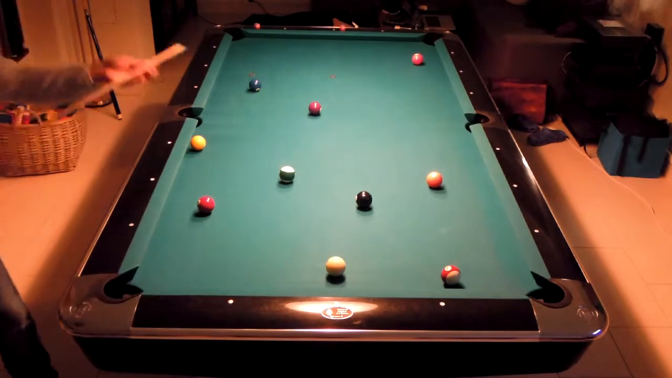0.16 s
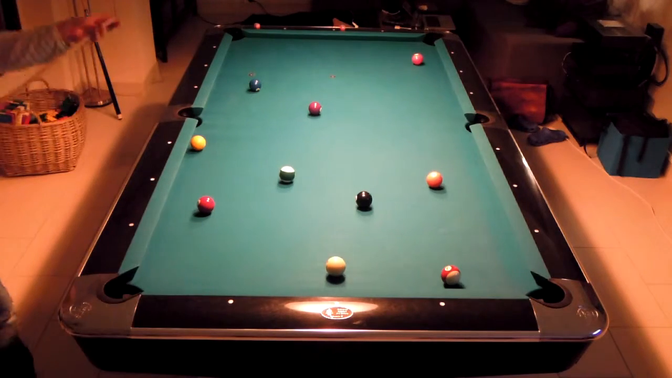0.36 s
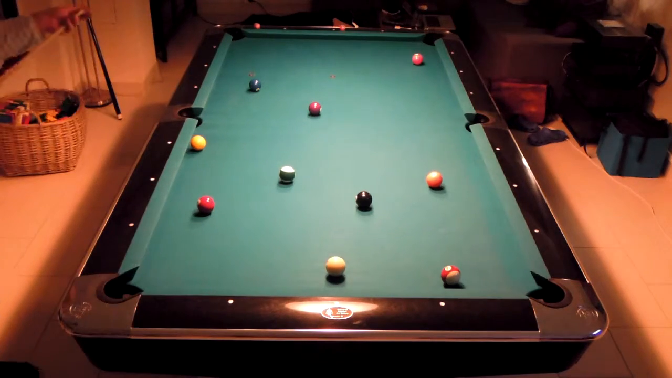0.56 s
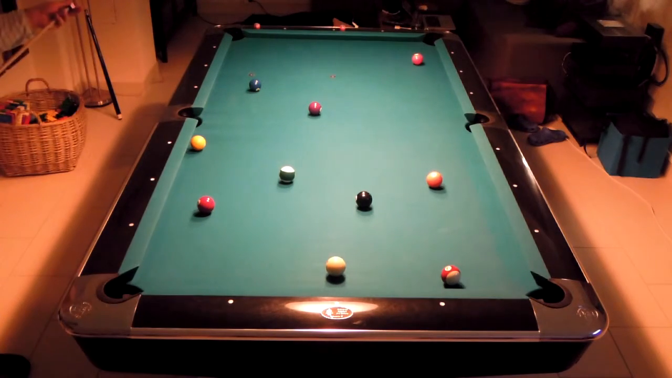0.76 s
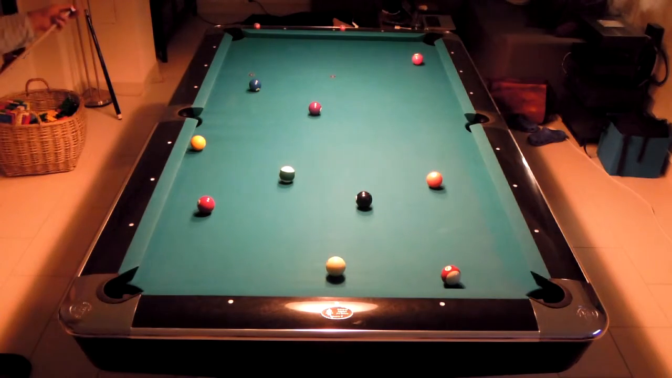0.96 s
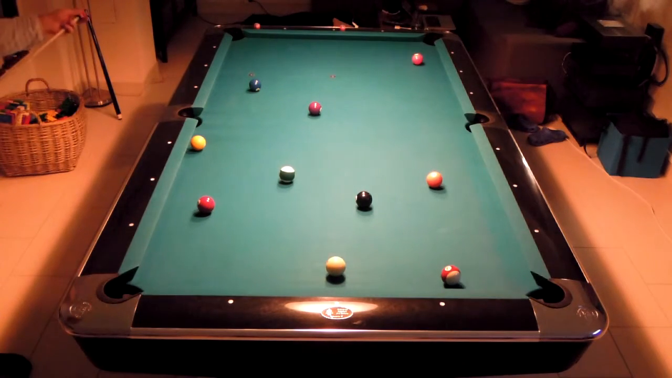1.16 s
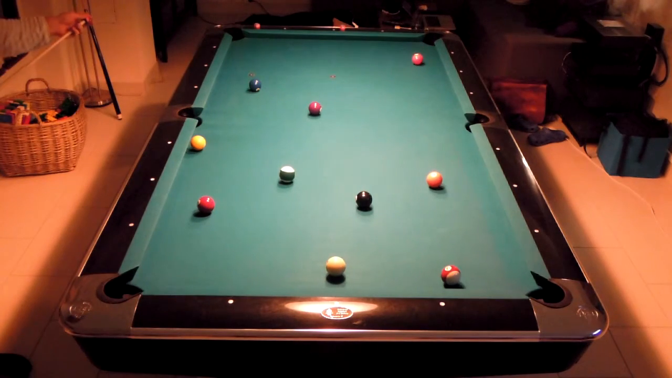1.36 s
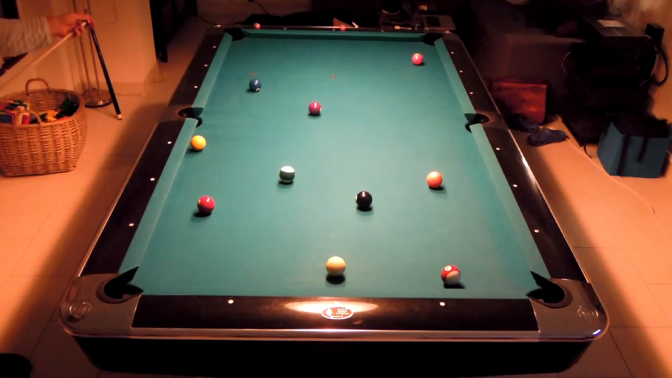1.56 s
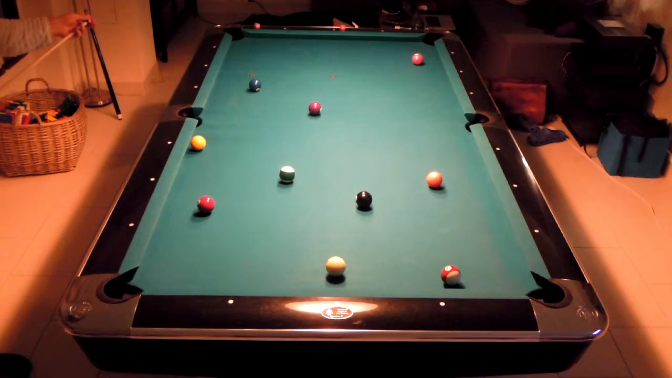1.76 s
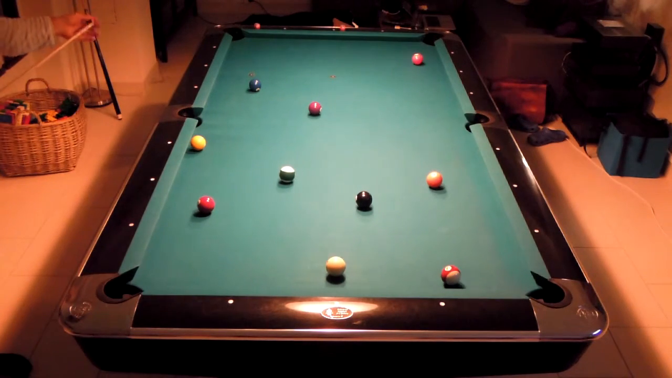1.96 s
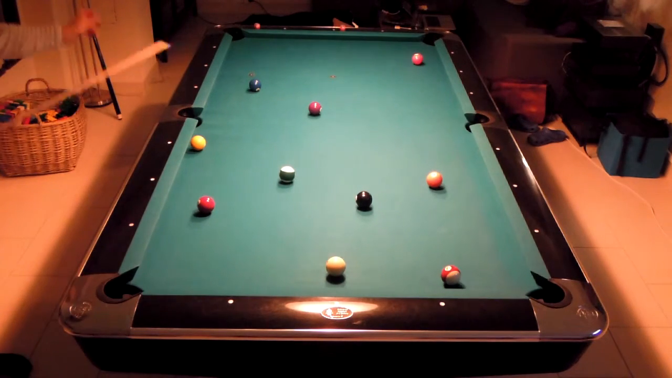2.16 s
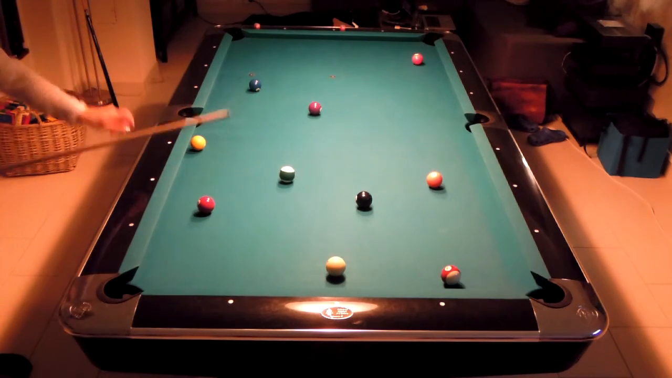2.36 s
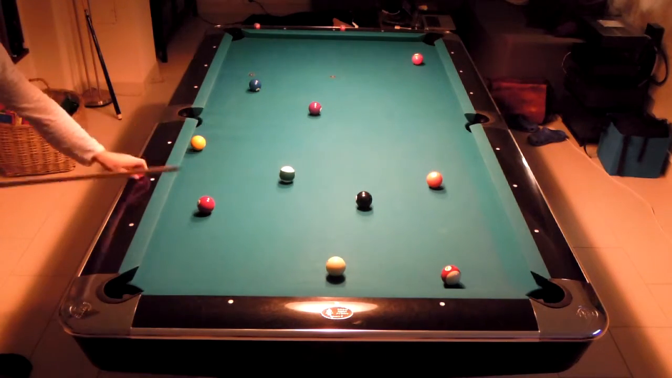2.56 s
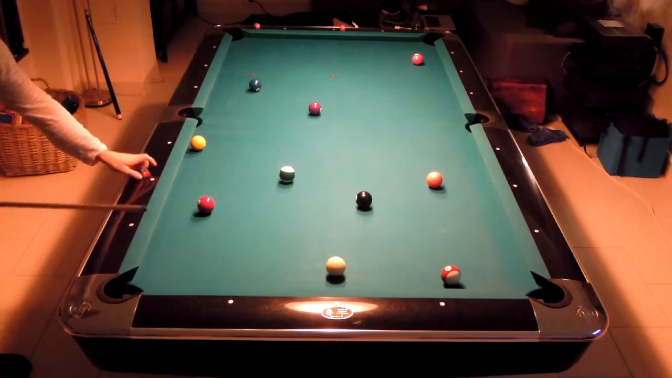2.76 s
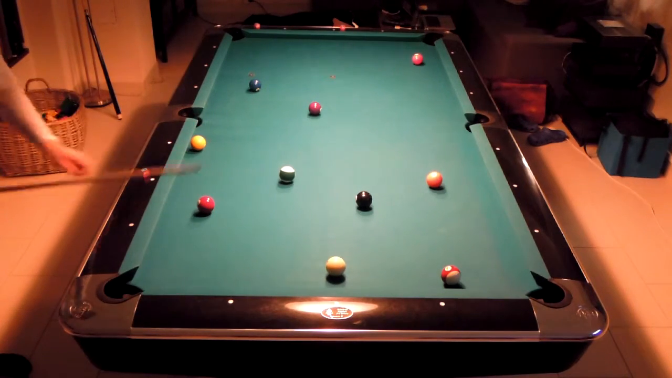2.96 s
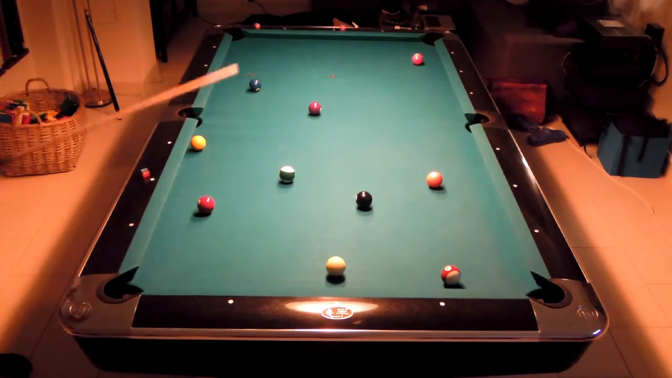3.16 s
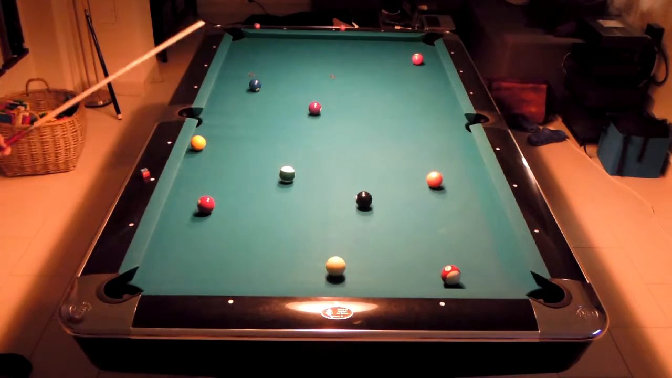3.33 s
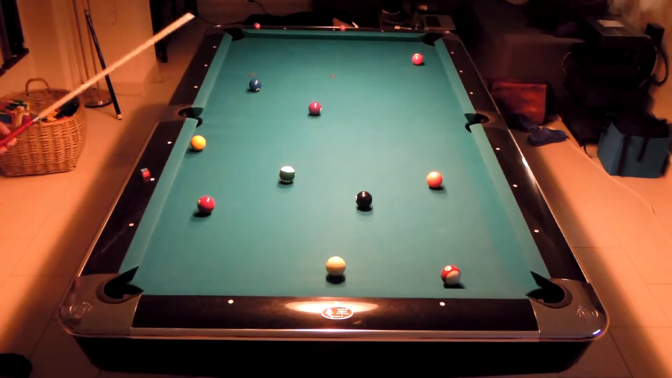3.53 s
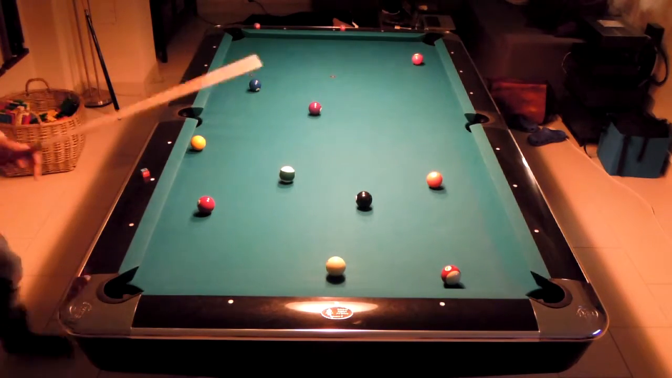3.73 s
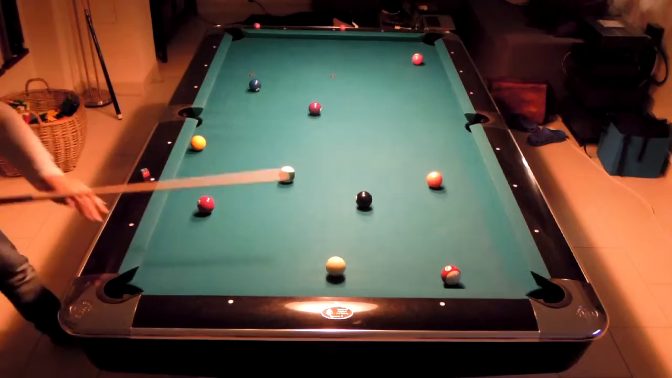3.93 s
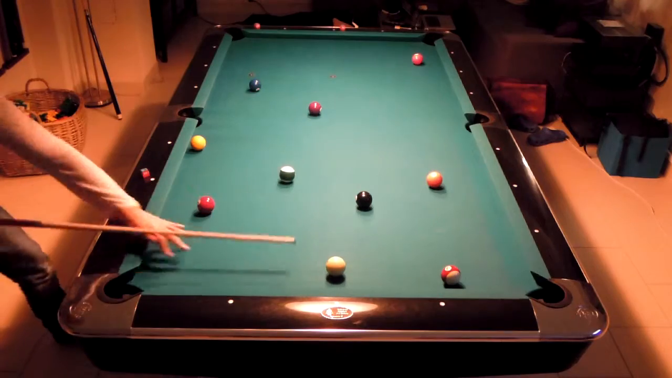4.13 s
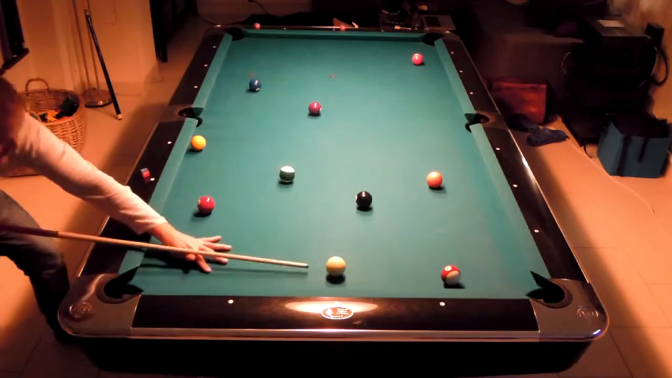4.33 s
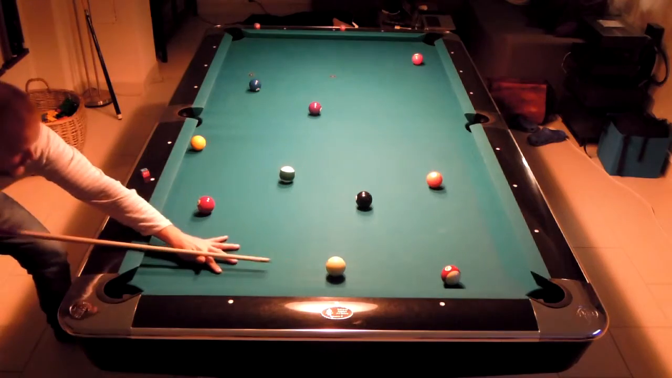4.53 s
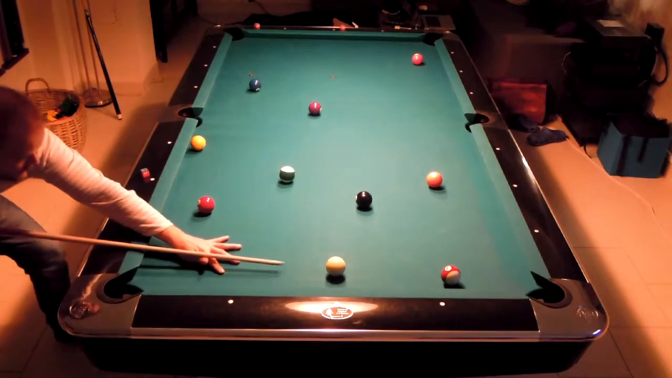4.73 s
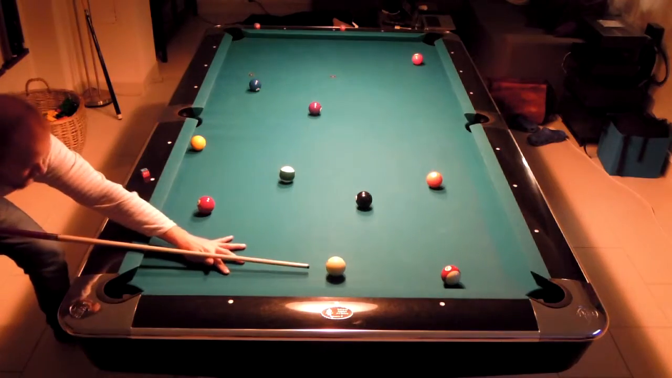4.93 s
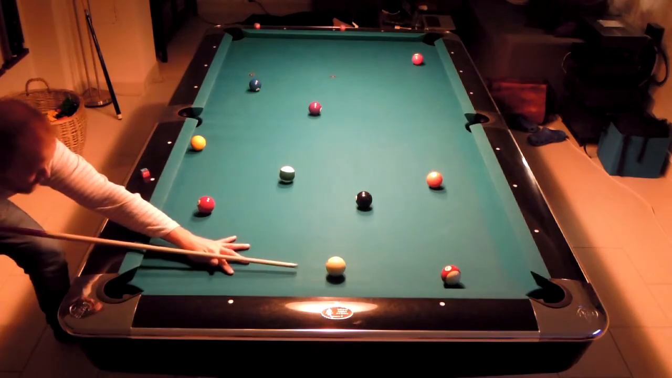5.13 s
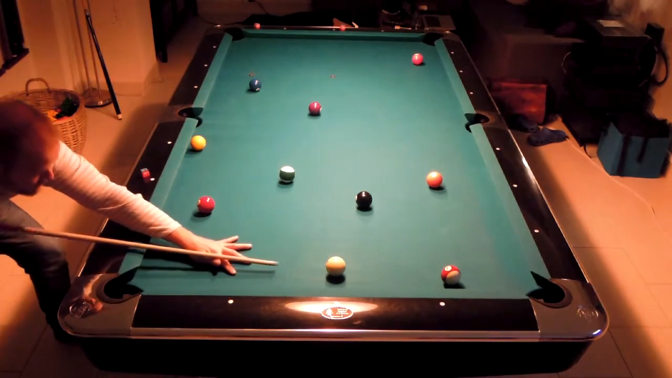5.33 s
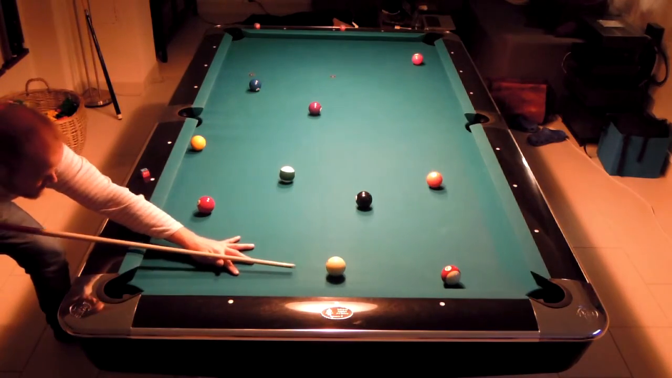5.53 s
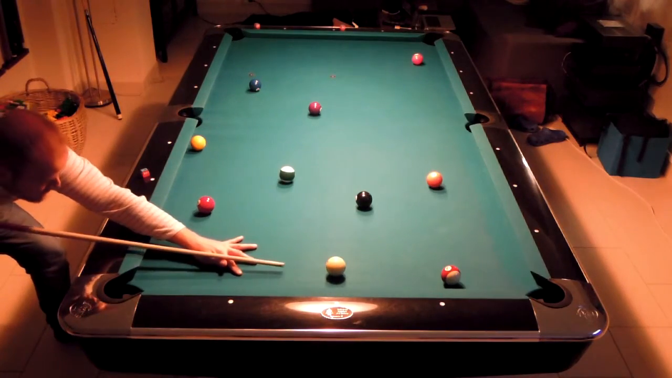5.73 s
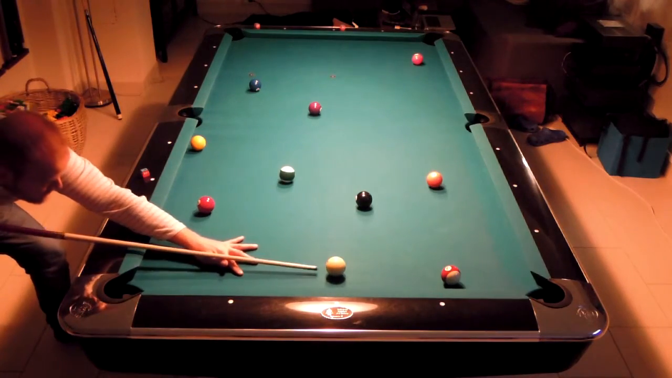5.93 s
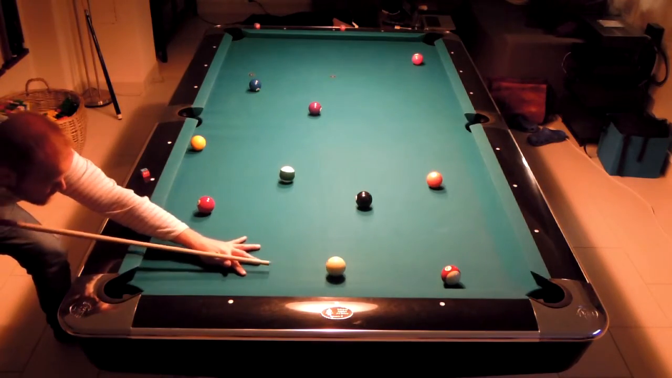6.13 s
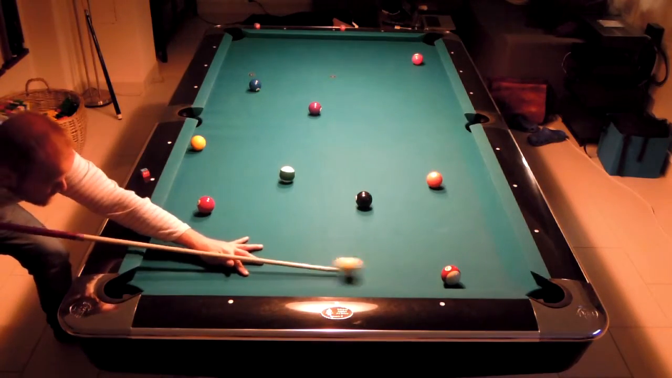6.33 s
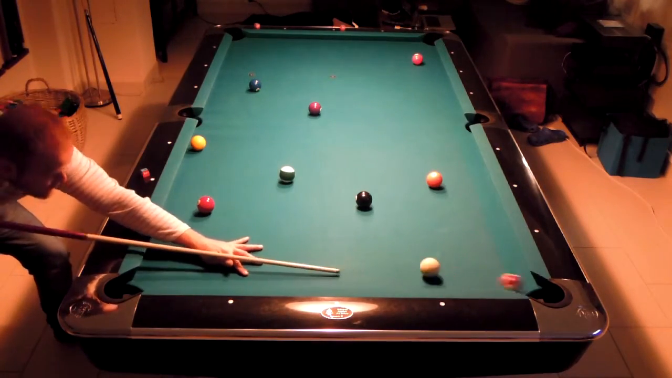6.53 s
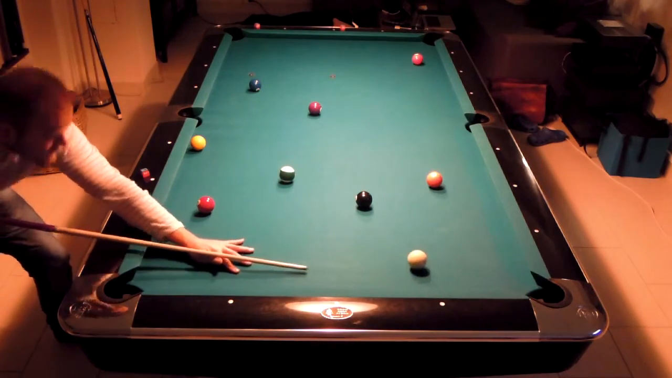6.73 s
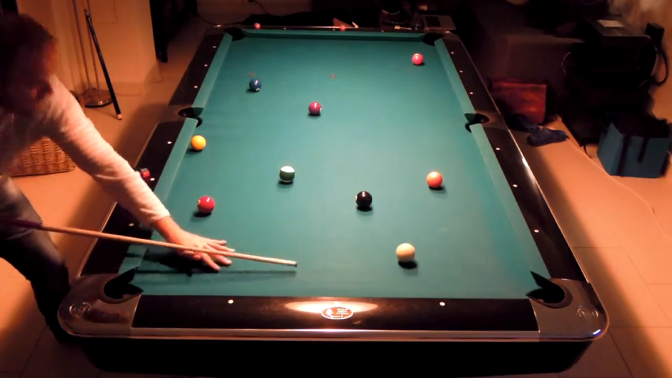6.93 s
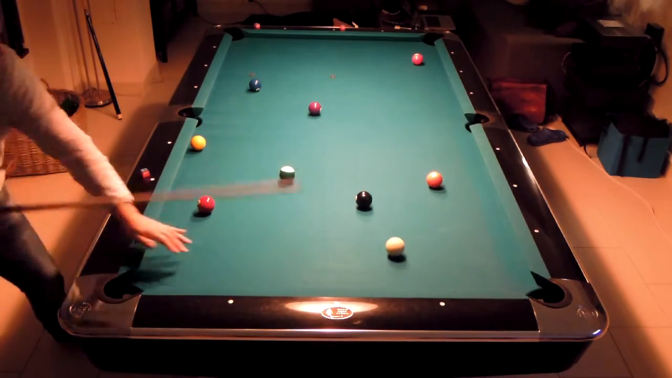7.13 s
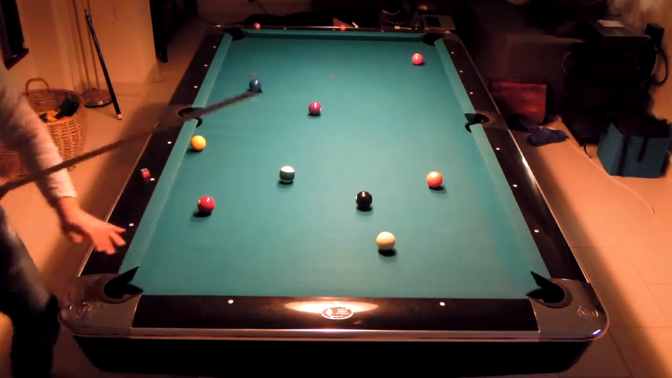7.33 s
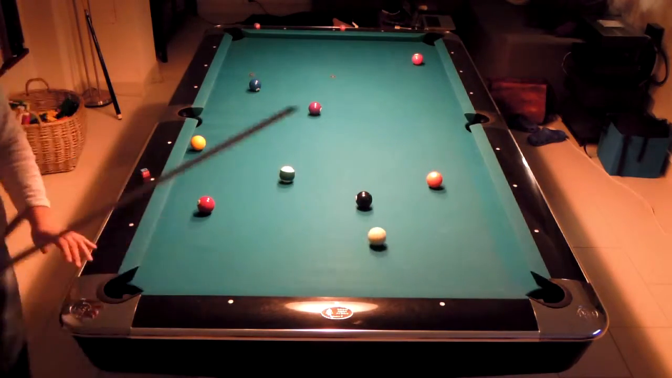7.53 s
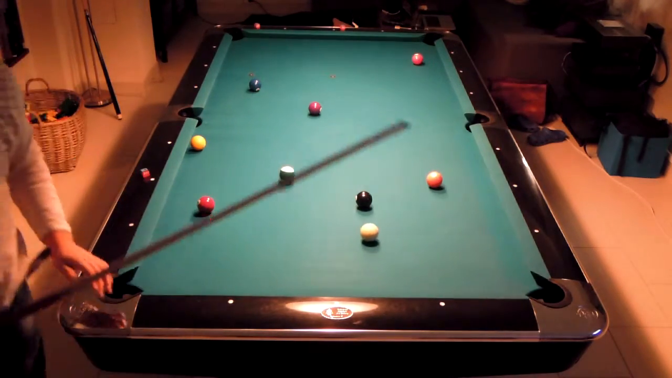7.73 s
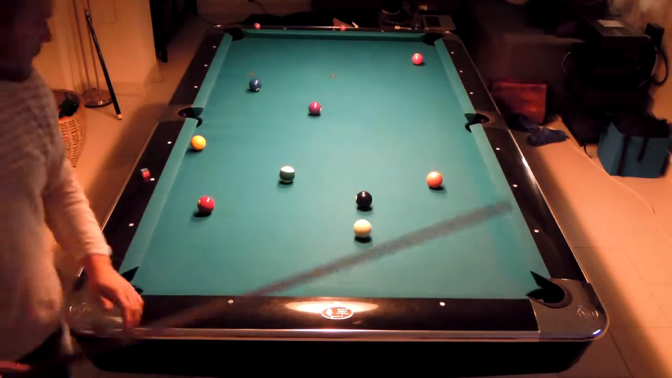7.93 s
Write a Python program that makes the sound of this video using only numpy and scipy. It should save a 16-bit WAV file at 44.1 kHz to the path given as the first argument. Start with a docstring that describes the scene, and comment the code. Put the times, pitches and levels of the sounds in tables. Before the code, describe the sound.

Quiet cue chalking and cloth rustle, then a cue knock, a loud ball clack, pocket thumps and a ball rattling down a wooden return.

```python
"""A cue ball clacks into a pool ball in a small, hard-walled games room: impacts as minimum-phase pulses.
The cue struck the white as tip scuff and ringing shaft; the struck ball thumps the pocket jaws, drops in and
rumbles down the return channel, exciting modes of channel and cabinet. Before that a hard object clinks, chalk
rasps and squeaks on the cue and is put on the rail, with dull bumps: noise under envelopes, and pulses.
Sleeves rustle over a faint room hiss, both shaped noise; the clack overloads the microphone."""
import sys
import numpy as np
from scipy import signal
from scipy.fft import rfft, irfft, next_fast_len
from scipy.io import wavfile

SR = 44100
rng = np.random.default_rng(int(sys.argv[2]) if len(sys.argv) > 2 else 0)


def wav_record(signal):
    """Record a signal, one row per channel, as 16-bit PCM in the file named by sys.argv[1]."""
    frames = np.transpose(np.atleast_2d(signal))
    bounded = np.clip(frames, -1, 1)
    # unit amplitude maps onto the largest positive 16-bit level
    quanta = np.round(bounded * 32767).astype(np.int16)
    wavfile.write(sys.argv[1], SR, quanta)


N = 356328  # samples

# modes of the wooden body of the table: f/Hz, relative level/dB, T60/s
CABINET = [(80.4, -13.5, 0.28), (133.5, -0.5, 0.116), (179.6, -1, 0.56), (198, -6, 0.1), (262, -6.5, 0.36),
           (290, -11.5, 0.38)]
# modes of the hollow return channel: f/Hz, relative level/dB, T60/s
CHANNEL = [(497.2, 1.5, 0.24), (510, -2.5, 0.14), (619, -7.5, 0.24), (718, -11, 0.3), (1120, -10, 0.067),
           (1300, -12, 0.052)]
# stereo spread of the room: f/Hz, side minus mid level/dB
ROOM_WIDTH = [(60, -14), (400, -24.5), (1300, -19.5), (2400, -15.5), (4400, -9), (8000, -3.5), (14000, 0.5)]


def clack():
    """Impact and early reflection: two resin balls touch briefly; rails and low ceiling throw the click back."""
    # ball on ball: t/s, energy level/dB, room level/dB
    clacks = [(6.6442, 13, 10)]
    # spectrum of the resin contact: f/Hz, relative level/dB
    resin = [(30, -53), (85, -7.5), (280, -8), (480, -8), (900, -0.5), (1400, 6.5), (2000, 10.5),
             (2600, 12), (3100, 6), (3800, -1), (4800, -20.5), (8000, -20.5), (14000, -19)]
    slaps = [(.0011, -6), (.0019, -9.5), (.0068, 0), (.0079, 6.5), (.0087, -23)]  # delay/s, level/dB
    return knocks(clacks, resin, slaps)


def cue():
    """Friction, then modal excitation: the chalked tip scuffs the white as it bites; the blow rings the shaft."""
    # cue on the white: t/s, knock level/dB, tip scuff level/dB, shaft ring level/dB
    strokes = [(6.5199, 4.5, 8.5, -1)]
    # spectrum of the tip's knock: f/Hz, relative level/dB
    tip = [(30, -40), (130, -6), (290, 3.5), (360, -2.5), (620, 7), (800, 8.5), (1050, 6.5), (1600, 2),
           (2200, 9.5), (2700, -6.5), (4000, -3), (6000, -26), (14000, -32)]
    # spectrum of the tip's scuff: f/Hz, relative level/dB
    scuff = [(60, -27), (800, -5), (3000, -5.5), (5000, -1), (6500, -6.5), (8200, -0.5), (10200, -3),
             (12500, -0.5), (14500, -18)]
    # modes of the shaft: f/Hz, relative level/dB, T60/s
    shaft = [(533, -12, .1), (1028, -7, .08), (1346, 1, .085), (1895, 1, .025), (2140, -3, .02),
             (2330, -5, .035), (3068, -9, .02), (3763, -12, .02), (5400, -10, .015)]
    scuff_lead_s = .0022
    out = 0
    for s, db, scuff_db, shaft_db in strokes:
        bite = amp(scuff_db) * burst(scuff, life=0.0014)
        blow = amp(db) * pulse(tip) + amp(shaft_db) * ring(shaft)
        out += placed(s - scuff_lead_s, room(bite, wet_db=0.0))
        out += placed(s, room(blow, wet_db=10.5, slaps=[(.0065, 0.0031)]))
    return out


def pocket():
    """Impact excitation of modes: jaws and drop knock the ball; each blow rings channel and cabinet."""
    # ball on the rubber jaws: t/s, thud level/dB, cabinet level/dB
    jaws = [(6.849, 1.5, 3.5), (6.866, -2.5, 8), (6.909, -2.5, 6.5)]
    # spectrum of the rubber thud: f/Hz, relative level/dB
    rubber = [(30, -38), (90, -19), (150, 9), (260, -3), (360, -5.5), (620, 3), (800, -10), (1300, -6),
              (2600, -26), (4000, -22), (8000, -32), (14000, -39)]
    # ball dropping through the pocket and along the return: t/s, knock level/dB, cabinet level/dB
    drops = [(6.9397, 7, 0), (6.9552, 0.5, -10), (7.199, 1.6, -12), (7.3192, -8, -11), (7.352, -7.5, -14),
             (7.467, -5, -5), (7.5219, -10, -11), (7.535, -10.5, 1), (7.622, -15.5, -7.5)]
    # spectrum of a knock before its tilt: f/Hz, relative level/dB
    knock_colour = [(30, -41), (100, -34), (350, -2), (520, 6.5), (850, -3), (1080, 11), (1500, -0.5),
                    (2300, 5), (3000, 2), (3600, -13), (4500, -23.5), (8000, -29), (14000, -31.5)]
    return_s = 7.2  # the ball leaves the open pocket for the closed channel
    room_db, room_db_per_s = 6.0, 16.5  # the deeper the ball, the less is heard directly
    bright_db, muffle_db_per_s = 1.86, 17  # and the duller it knocks: brightness in dB per octave
    cup = [(.0012, -3.5), (.0019, -2)]  # echoes focused by the cup of the pocket: delay/s, level/dB
    out = 0
    for s, db, body_db in jaws:
        thud = amp(db) * burst(rubber, life=0.0028)
        wood = amp(body_db) * ring(CABINET) + amp(db + 2) * ring(CHANNEL)
        out += placed(s, room(thud, wet_db=3.5) + room(wood, wet_db=-13.0))
    for s, db, body_db in drops:
        inside_s = max(s - return_s, 0)
        wet_db = room_db + room_db_per_s * inside_s
        tilt_db = bright_db - muffle_db_per_s * inside_s
        knock = amp(db) * pulse(knock_colour, tilt_db)
        wood = amp(body_db) * ring(CABINET) + amp(db - 0.5) * ring(CHANNEL)
        out += placed(s, room(knock, wet_db, cup) + room(wood, wet_db=-5.0))
    return out


def rolling():
    """Roughness excitation: balls rumble over slate; in the return channel tiny bumps rattle and drive the wood."""
    # the white before and after the clack and the struck ball between: start t/s, end t/s, level/dB
    rolls = [(6.533, 6.602, -35), (6.656, 6.851, -32), (6.68, 8.07, -48.5)]
    # the pocketed ball on the legs of the return: start t/s, end t/s, rumble level/dB, rattle level/dB
    runs = [(6.95, 7.16, -35, -33), (7.252, 7.407, -38.5, -33.5), (7.47, 7.676, -39, -29.5)]
    # spectrum of the rumble: f/Hz, relative level/dB
    slate = [(25, -35.5), (55, -19), (84, 5.5), (108, -21), (170, -2), (240, 2.5), (330, -2.5), (430, -12),
             (800, -27), (2000, -37), (6000, -60)]
    # spectrum of the rattle: f/Hz, relative level/dB
    rattle_colour = [(100, -16), (380, -24), (520, -5), (720, 5.5), (840, 4.5), (1050, -2), (1400, -6),
                     (1800, 5), (2700, -37), (3500, -10), (5000, -22), (14000, -29.5)]
    attack_s, slowing_db_per_s, release_db_per_s = 0.01, 13, 133
    settle_db_per_s = 92  # the rattle dies as the ball settles into each run
    cabinet_db, channel_db = 2.0, -5.5  # cabinet over rumble, channel over bumps
    bump_rate = 250  # mean bumps per second

    def roll(start, end, fade_db_per_s):
        """Envelope of one passage: friction makes it fade."""
        return spell(start, end, attack_s, fade_db_per_s, release_db_per_s)

    def driven(modes):
        """Forced vibration: dense contacts convolved with a modal ring."""
        return unit(signal.fftconvolve(grains(spread_db=5.5), ring(modes))[:N])

    on_slate = sum(amp(db) * roll(start, end, slowing_db_per_s) for start, end, db in rolls)
    inside = sum(amp(db) * roll(start, end, slowing_db_per_s) for start, end, db, _ in runs)
    rattle = sum(amp(db) * roll(start, end, settle_db_per_s) for start, end, _, db in runs)
    rumble = (on_slate + inside) * coloured(grains(spread_db=3), slate)
    body = amp(cabinet_db) * inside * driven(CABINET)
    bumpy = (rng.random(N) < bump_rate / SR) * rng.standard_normal(N)
    clatter = rattle * (coloured(bumpy, rattle_colour) + amp(channel_db) * driven(CHANNEL))
    return room(rumble + body, wet_db=-10.5) + room(clatter, wet_db=1.0)


def boom():
    """Resonance build-up: the lowest table mode grows while the ball runs inside, then rings out."""
    boom_hz, boom_db = 44.3, -37.5
    start_s, end_s, attack_s, release_db_per_s = 6.95, 7.48, .18, 32
    phase_drift = .5 * unit(filtered(rng.standard_normal(N), lambda hz: hz < 3))
    level = amp(boom_db) * spell(start_s, end_s, attack_s, 0, release_db_per_s)
    return level * np.sin(2 * np.pi * boom_hz * np.arange(N) / SR + phase_drift)


def chalking():
    """Dry friction: loose grit rasps in clumps and rings the cube; the leather squeaks where it catches."""
    # back-and-forth strokes of the chalk over the tip: t/s, level/dB, half length/s
    chalk_strokes = [(0.983, -57, 0.0037), (1.013, -42.5, .01), (1.057, -50, .029), (1.165, -49, .026),
                     (1.224, -41, 0.018), (1.311, -38, 0.016), (1.406, -45.5, 0.019), (1.479, -44, 0.017),
                     (1.543, -46, 0.018), (1.618, -49.5, 0.01), (1.685, -48, 0.017), (1.817, -50, .015),
                     (1.894, -44.5, 0.02), (1.969, -52, .008), (2.046, -48, 0.027), (2.125, -39.5, 0.0045)]
    # spectrum of the scraping: f/Hz, relative level/dB
    chalk = [(530, -30), (900, -11.5), (1190, -13.5), (1490, -10), (1800, -10.5), (2790, -4.5),
             (6350, -5.5), (13500, -10.5), (14500, -36), (15000, -62)]
    # spectrum of the squeak: f/Hz, relative level/dB
    squeak_colour = [(800, -37), (2000, -15), (3200, -8), (4000, 3.5), (5500, 1), (7500, 3.5), (9000, -7),
                     (14000, -45)]
    # resonances of the chalk cube and ferrule: f/Hz, width/Hz, relative level/dB
    cube = [(1485, 73, -4), (3100, 86, -1), (5110, 150, -1.5), (6330, 120, -1), (6760, 43, -4),
            (7200, 37, -7), (7900, 42, -3)]
    cube_db = -10.5  # resonances over scraping
    # before the room, a stroke of this half length squeaks as loudly as it rasps; quicker ones squeak more
    even_s, squeak_db_per_halving = 0.018, 5
    clump_hz = 180  # upper limit of the clumping
    clumps = np.tanh(unit(filtered(rng.standard_normal(N), lambda hz: hz < clump_hz)))
    scraping = amp(5.0 * clumps) * coloured(grains(spread_db=2.5), chalk)
    cube_ring = amp(cube_db) * resonant(grains(spread_db=21), cube)
    rasp = unit(unit(scraping) + cube_ring)
    grit = swells(chalk_strokes) * rasp
    catches = [(s, db + squeak_db_per_halving * np.log2(even_s / half), half)
               for s, db, half in chalk_strokes]
    squeak = swells(catches) * coloured(grains(spread_db=11.5), squeak_colour)
    slightly_left = amp([[.6], [-.6]])
    return slightly_left * (room(grit, wet_db=4.0) + room(squeak, wet_db=-5.5))


def taps():
    """Impact: the chalk is put on the rail in short contacts."""
    # chalk on the rail: t/s, energy level/dB, room level/dB
    contacts = [(2.7556, -17, 16.5), (2.7595, -8, 5), (2.793, -20, 11)]
    # spectrum of the contact: f/Hz, relative level/dB
    rail = [(40, -19), (170, -6), (290, 7), (410, 2.5), (530, 4.5), (780, 0), (1000, 3), (1450, -2.5),
            (2350, 3.5), (3200, -3.5), (4100, -12.5), (5500, -26), (14000, -35)]
    return knocks(contacts, rail)


def clink():
    """Impact with modal decay: a small hard object knocks and rings briefly, away from the table."""
    # small hard object set down: t/s, knock level/dB, ring level/dB
    clinks = [(.3262, -5.5, -6.5)]
    # spectrum of its knock: f/Hz, relative level/dB
    clink_colour = [(100, -37), (370, -24), (500, -12), (700, -19.5), (950, -3.5), (1150, -13),
                    (2000, -1.5), (3100, 1.5), (3900, -18), (5000, -10), (6600, -12.5), (8200, -24),
                    (14000, -26.5)]
    # modes of the object: f/Hz, relative level/dB, T60/s
    clink_modes = [(980, -17, .04), (1320, -13, .05), (1873, -10, .05), (2509, -3, .045), (2760, -1, .06),
                   (2905, 0, .06), (3110, 0, .04), (5010, -16, .03), (5900, -17, .03)]
    slaps = [(.006, 1.9), (.013, 0.58)]  # delay/s, level/dB
    out = 0
    for s, db, ring_db in clinks:
        blow = amp(db) * pulse(clink_colour) + amp(ring_db) * ring(clink_modes)
        out += placed(s, room(blow, wet_db=14.5, slaps=slaps))
    return out


def bumps():
    """Soft impact: dull, mostly low-frequency contacts as the player moves about."""
    # bumps: t/s, energy level/dB, room level/dB
    contacts = [(2.2262, -13, 6), (2.236, -18, 11), (2.30, -27, 9), (3.09, -31.5, 10), (3.33, -32, 13),
                (3.575, -26.5, -1)]
    # spectrum of a bump: f/Hz, relative level/dB
    bump_colour = [(30, -28), (85, 1.5), (120, -14), (175, 3.5), (280, -5.5), (400, -9), (500, 3), (650, 0),
                   (760, -20), (1100, -8), (2500, -14.5), (3300, -20.5), (6000, -42), (14000, -57)]
    return knocks(contacts, bump_colour)


def sleeves():
    """Friction noise: cloth brushes softly as the player moves; the shaft slides through the hand, brighter."""
    # sleeves rustling as the player moves: t/s, level/dB, half length/s
    rustles = [(.1, -47.5, 0.046), (.51, -40.5, 0.048), (.71, -41.5, .15), (3.23, -49, 0.047),
               (3.827, -47, 0.026), (4.151, -43, 0.074), (4.437, -43, 0.068), (7.484, -34.5, .017),
               (7.8, -45.5, .25)]
    # shaft in the hand, as the cue is lowered, aimed and lifted: t/s, level/dB, half length/s
    slides = [(3.513, -48, 0.029), (3.624, -41.5, 0.055), (4.7, -49.5, 0.22), (4.983, -50.5, 0.035),
              (5.54, -49.5, .31), (6.336, -51, 0.082), (6.49, -46, 0.032), (7.598, -49.5, 0.05)]
    # spectrum of the friction before it is split: f/Hz, relative level/dB
    cloth_colour = [(300, -22.5), (1000, 3), (2500, 4.5), (5000, 4), (10000, 5.5), (14500, 0.5)]
    rustle_treble_db, slide_bass_db = -9, -12  # sleeves are dull, the shaft hisses
    split_hz = 4000
    pair = np.array([coloured(grains(spread_db=4.5), cloth_colour) for _ in range(2)])
    rustle = stereo(pair, ROOM_WIDTH)
    dull = filtered(rustle, lambda hz: 1 / (1 + (hz / split_hz) ** 2))
    cloth, shaft = swells(rustles), swells(slides)
    low = cloth + amp(slide_bass_db) * shaft
    high = shaft + amp(rustle_treble_db) * cloth
    return amp([[-1], [-2.5]]) * (low * dull + high * (rustle - dull))  # the player stands on the left


def air():
    """Stationary noise: the steady hiss and rumble of the room."""
    # spectrum of the room noise: f/Hz, relative level/dB
    air_colour = [(12, -32), (20, 6.5), (54, -3.5), (84, 1), (143, -7), (183, -5), (497, -8.5),
                  (796, -10.5), (1170, -7.5), (1930, -16), (2340, -13), (3180, -17), (10500, -21.5),
                  (13800, -20.5), (15000, -65)]
    # its stereo spread: f/Hz, side minus mid level/dB
    air_width = [(60, -10.5), (110, -3.5), (200, -4), (380, -2.5), (700, -3), (1290, -5), (2370, -1.5),
                 (4380, -1), (8090, -1), (14900, -0.5)]
    return amp(-51.5) * stereo(coloured(rng.standard_normal((2, N)), air_colour), air_width)


def knocks(rows, spectrum, slaps=()):
    """Impulse response: short contacts (t/s, level/dB, room level/dB) that ring only in the room."""
    return sum(placed(s, room(amp(db) * pulse(spectrum), wet_db, slaps)) for s, db, wet_db in rows)


def room(x, wet_db, slaps=(), early_db=3.5, early_s=0.048):
    """Reverberation: direct sound, slaps (delay/s, level/dB) and a diffuse tail with a stronger early part."""
    # decay time of the diffuse field: f/Hz, T60/s
    room_t60 = [(100, 0.67), (400, 0.62), (1000, 0.59), (2700, 0.58), (7000, 0.44), (14000, 0.28)]
    hz, t, z = signal.stft(rng.standard_normal((2, SR)), SR, nperseg=256)
    decay = np.exp(-np.log(1000) * t / along(room_t60, hz)[:, None])
    tail = signal.istft(z * decay, SR, nperseg=256)[1][:, :SR]
    t = np.arange(SR) / SR
    onset = 1 - np.exp(-(t / 0.00084) ** 2)
    tail *= onset * amp(early_db * np.exp(-t / early_s))
    answer = amp(wet_db) * stereo(tail / np.linalg.norm(tail[0]), ROOM_WIDTH)
    answer[:, 0] += 1  # direct sound
    for delay, db in slaps:
        answer[:, round(delay * SR)] += amp(db)
    return signal.fftconvolve(x[None], answer, axes=1)[:, :N]


def pulse(spectrum, tilt_db=0):
    """Minimum phase: a causal contact pulse of energy 1, half a second long, from a folded cepstrum."""
    hz = np.fft.rfftfreq(SR, 1 / SR)
    tilt = tilt_db * np.log2(np.maximum(hz, 500) / 1000)  # dB, level below 500 Hz
    cepstrum = irfft(np.log(amp(along(spectrum, hz) + tilt)))
    cepstrum[1:SR // 2] *= 2
    cepstrum[SR // 2 + 1:] = 0
    return unit_energy(irfft(np.exp(rfft(cepstrum)))[:SR // 2])


def ring(modes, scatter_db=0.5):
    """Modal superposition: damped sines at slightly random strengths, energy 1."""
    t = np.arange(SR // 2) / SR
    out = 0
    for k, (hz, db, t60) in enumerate(modes):
        strength = (-1) ** k * amp(db + scatter_db * rng.standard_normal())
        out = out + strength * np.exp(-np.log(1000) * t / t60) * np.sin(2 * np.pi * hz * t)
    return unit_energy(out)


def burst(spectrum, life):
    """Transient friction: contact noise that peaks after life seconds and dies, energy 1."""
    u = np.arange(SR // 2) / SR / life
    return unit_energy(coloured(rng.standard_normal(len(u)), spectrum) * u * np.exp(-u))


def grains(spread_db):
    """Granular contact: dense tiny contacts of uneven size, at rms 1."""
    size = np.tanh(rng.standard_normal(N) / 2) * 2
    return unit(rng.standard_normal(N) * amp(spread_db * size))


def resonant(x, peaks):
    """Forced resonance: x through parallel second-order bandpasses of alternating sign, at rms 1."""
    def response(f):
        total = 0
        for k, (centre, width, db) in enumerate(peaks):
            damping = 1j * f * width
            total = total + (-1) ** k * amp(db) * damping / (centre * centre - f * f + damping)
        return total
    return unit(filtered(x, response))


def spell(start, end, attack_s, fade_db_per_s, release_db_per_s):
    """Exponential envelope: rises from start, fades slowly until end, then dies away."""
    t = np.arange(N) / SR
    age, after = np.maximum(t - start, 0), np.maximum(t - end, 0)
    return (1 - np.exp(-age / attack_s)) * amp(-fade_db_per_s * age - release_db_per_s * after)


def swells(rows):
    """Gaussian envelope: a smooth rise and fall for each row (t/s, level/dB, half length/s)."""
    t = np.arange(N) / SR
    return sum(amp(db) * np.exp(-.5 * ((t - s) / half) ** 2) for s, db, half in rows)


def placed(s, sound):
    """Time shift: a stereo sound starting s seconds in."""
    return np.pad(sound, ((0, 0), (round(s * SR), N)))[:, :N]


def stereo(pair, width):
    """Mid-side coding: two unrelated signals as mid and side, the side weighted by width."""
    side = filtered(pair[1], lambda hz: amp(along(width, hz)))
    return np.array([pair[0] + side, pair[0] - side])


def coloured(x, spectrum):
    """Spectral shaping: x filtered by the given spectrum, at rms 1."""
    return unit(filtered(x, lambda hz: amp(along(spectrum, hz))))


def filtered(x, response):
    """Linear filtering: the spectrum of x times a response of frequency."""
    size = next_fast_len(x.shape[-1] + 8192)
    return irfft(rfft(x, size) * response(np.fft.rfftfreq(size, 1 / SR)), size)[..., :x.shape[-1]]


def along(points, hz):
    """Logarithmic pitch scale: (f/Hz, value) points interpolated on a log axis."""
    f, v = np.transpose(points)
    return np.interp(np.log(hz + 1), np.log(f + 1), v)


def amp(db):
    """Level to amplitude: decibels to gain."""
    return 10 ** (np.asarray(db) / 20)


def unit(x):
    """Power normalisation: x scaled to rms 1."""
    return x / np.sqrt(np.mean(x ** 2) + 1e-20)


def unit_energy(x):
    """Energy normalisation: x scaled to a sum of squares of 1."""
    return x / np.sqrt(np.sum(x ** 2) + 1e-20)


def scene():
    """Superposition: shot and pocket, the preparation and the quiet room."""
    shot = clack() + cue() + pocket() + rolling() + boom()
    preparation = chalking() + taps() + clink() + bumps()
    return shot + preparation + sleeves() + air()


def record(dry):
    """Saturation and band limit: the microphone leans slightly right and flattens the loudest peaks."""
    ceiling, top_hz = .95, 14600
    x = dry * amp([[-.25], [.25]])
    x = x / (1 + np.abs(x / ceiling) ** 8) ** (1 / 8)
    return filtered(x, lambda hz: hz < top_hz)


dry = scene()
out = record(dry)
wav_record(out)
```